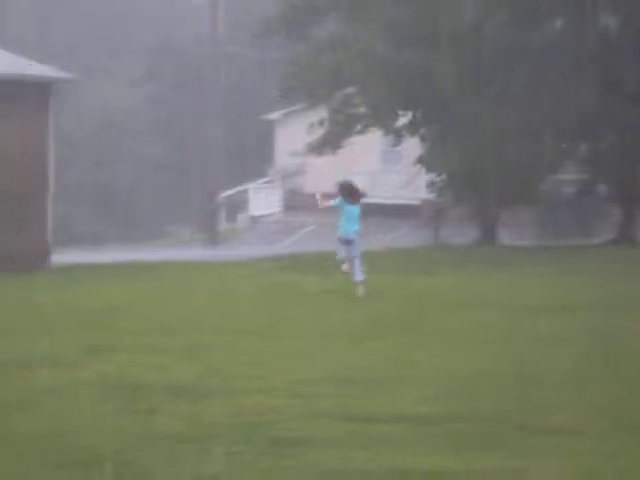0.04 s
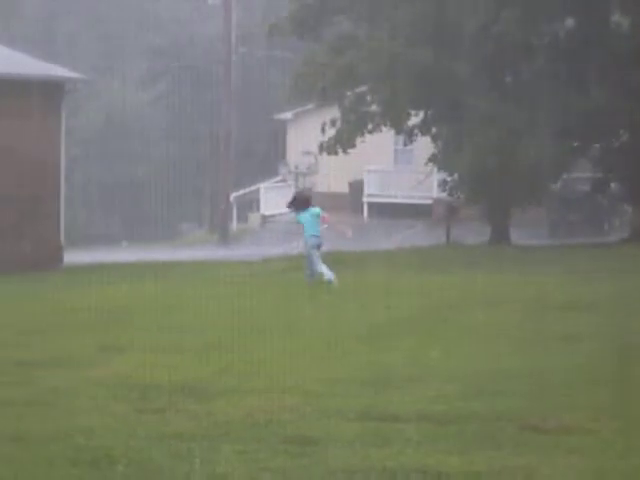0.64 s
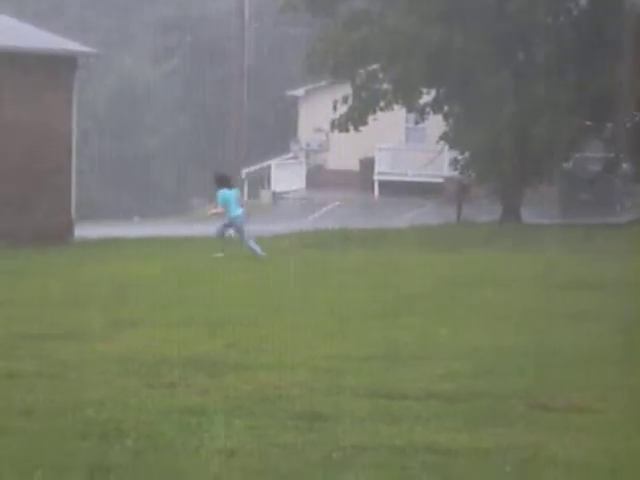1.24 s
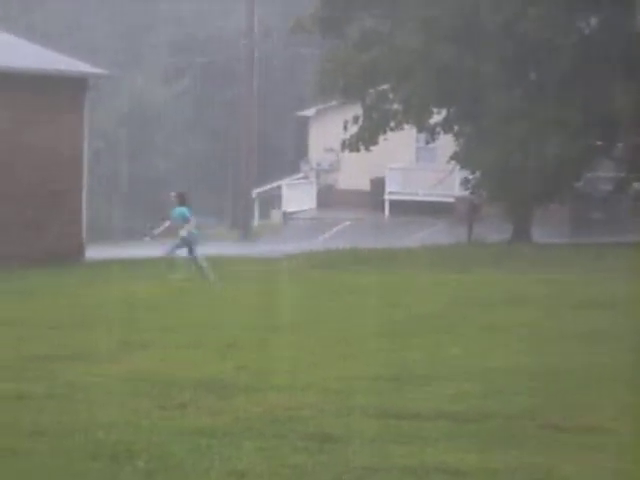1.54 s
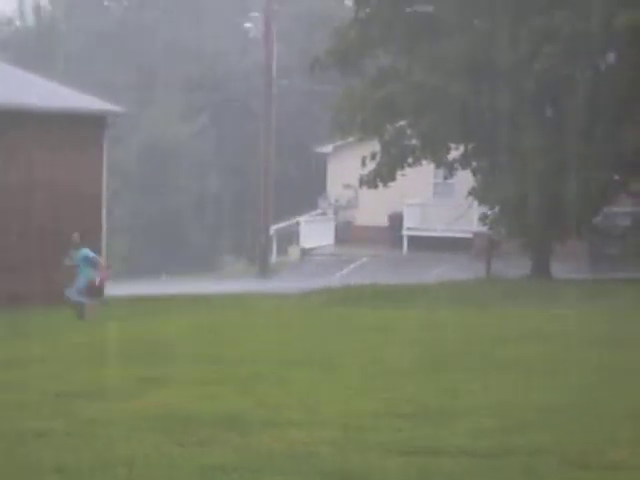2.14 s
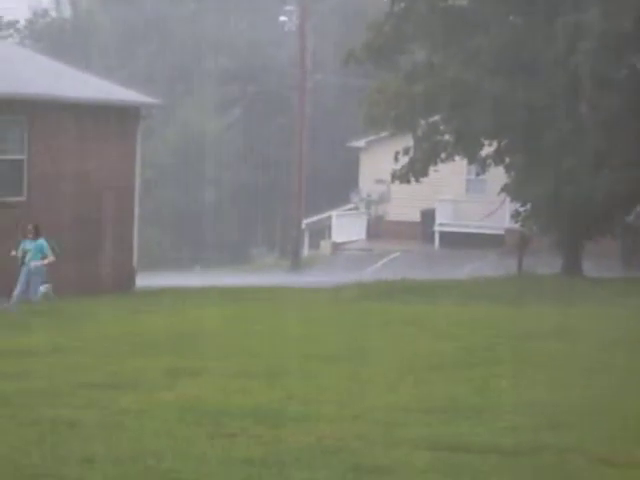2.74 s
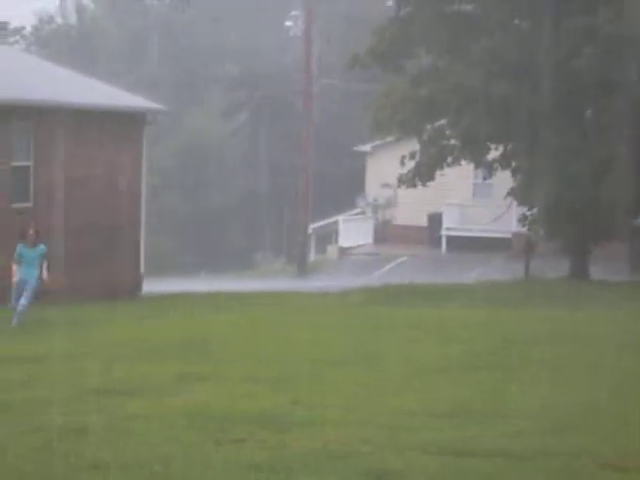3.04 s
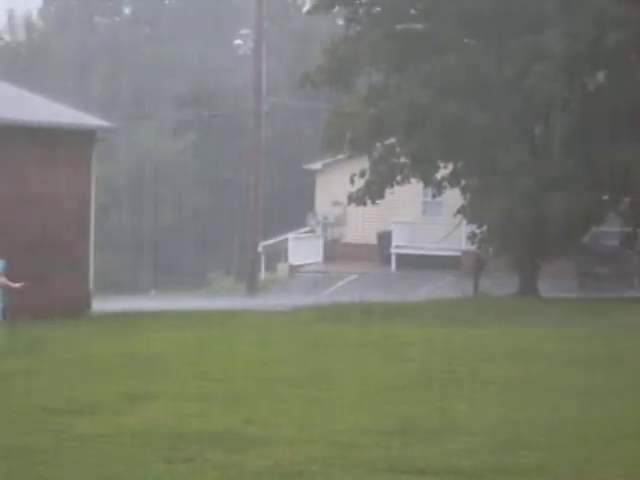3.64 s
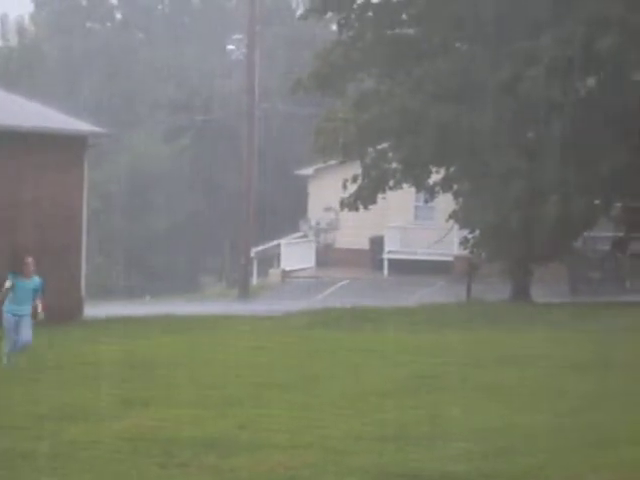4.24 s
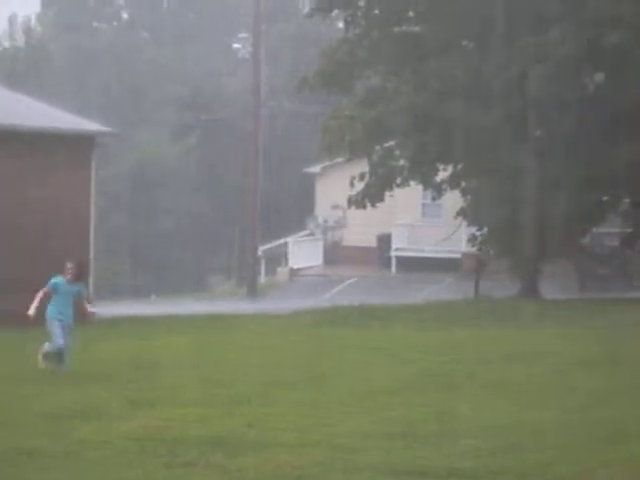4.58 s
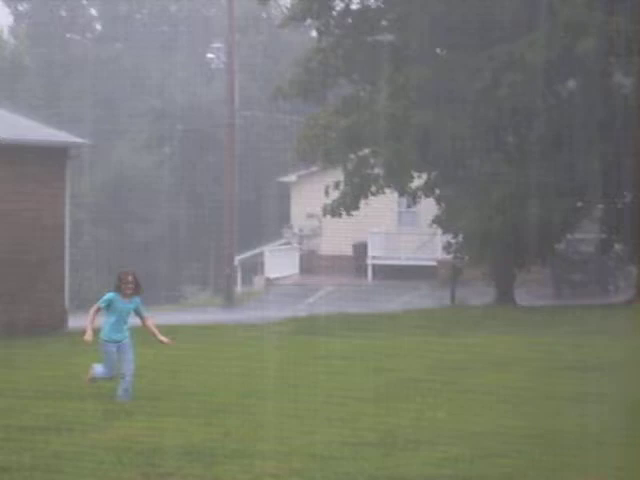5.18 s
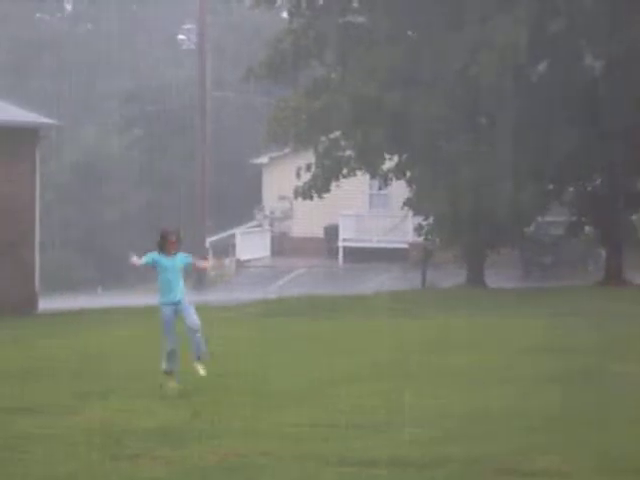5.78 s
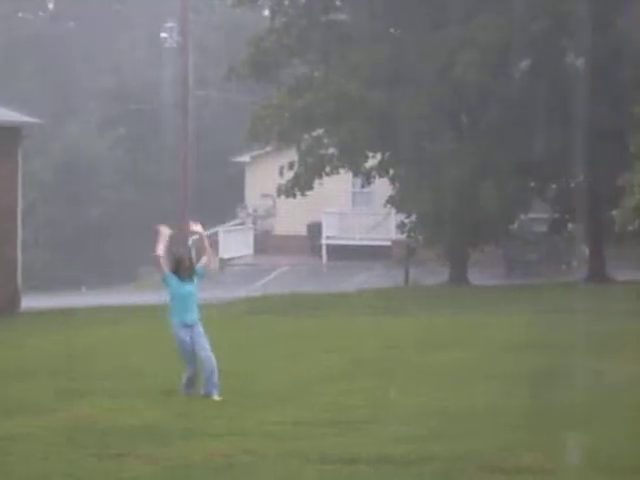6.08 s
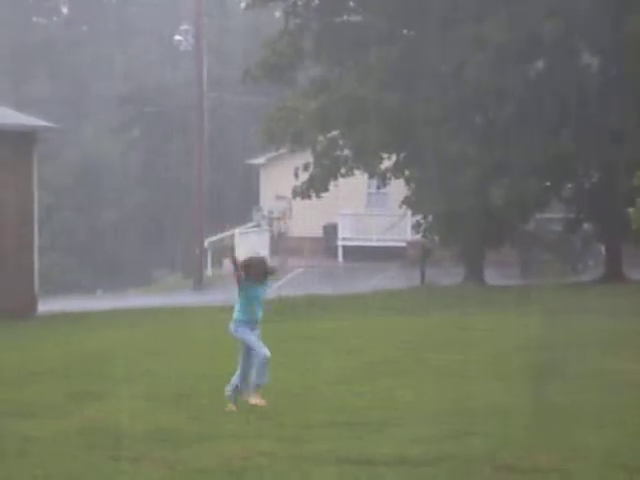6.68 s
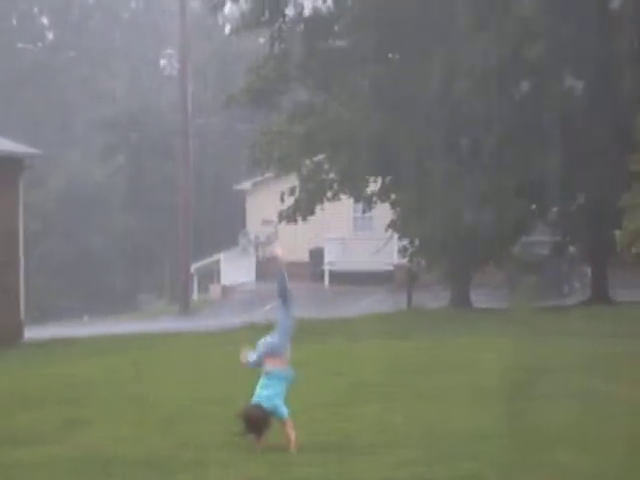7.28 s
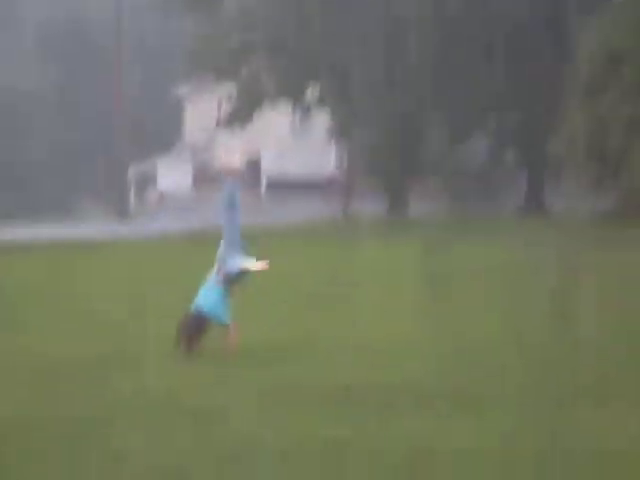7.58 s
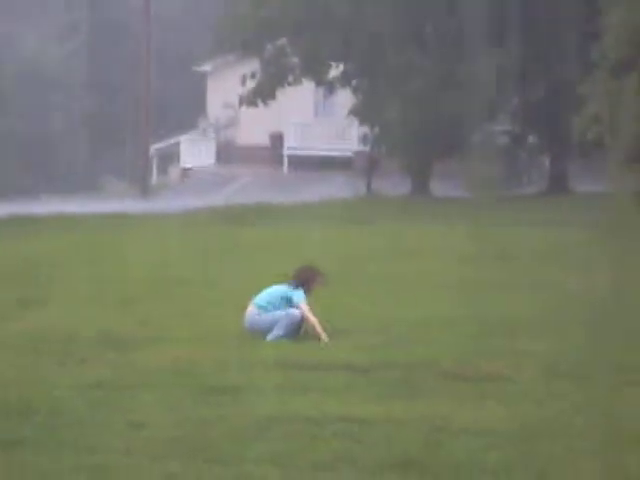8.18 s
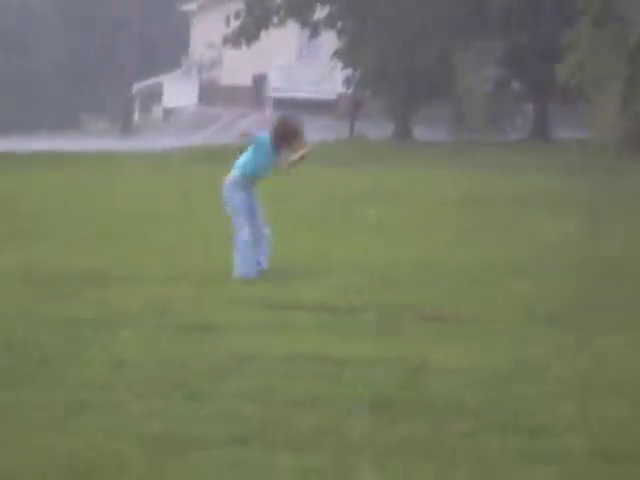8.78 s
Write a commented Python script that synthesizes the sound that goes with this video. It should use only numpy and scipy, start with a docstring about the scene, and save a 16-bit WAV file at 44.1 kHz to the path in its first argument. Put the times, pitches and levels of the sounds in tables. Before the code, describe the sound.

A dense downpour heard from under a porch, with runoff splattering on wet ground and a few small puddle plinks.

```python
"""Heavy rain on a lawn, trees and roofs, heard on a small microphone under a porch roof.
Far out, countless drops merge into a wash; on the nearby ground they patter. Close by, runoff
from the eave breaks up in splats on the wet ground and traps bubbles that plink in a puddle.
Some of it hits a piece of sheet metal that rings. The porch gives the near sounds a short tail."""
import sys
import numpy as np
from scipy import signal
from scipy.fft import rfft, irfft
from scipy.io import wavfile

SR = 44100
rng = np.random.default_rng(int(sys.argv[2]) if len(sys.argv) > 2 else 0)


def log_audio(samples):
    """Write samples as a 16-bit WAV file to the path given in sys.argv[1]."""
    # one column per channel
    frames = np.atleast_2d(samples).T
    # limit to full scale, then quantise
    limited = np.clip(frames, -1, 1)
    pcm = np.round(limited * 32767).astype(np.int16)
    wavfile.write(sys.argv[1], SR, pcm)


N = 397782

# spectra of the far wash, the near drops and a splat of runoff: f/Hz, relative level/dB
WASH_SPECTRUM = [(25, -27), (55, -24), (150, -12.5), (210, -12), (320, -12.5), (400, -10.5), (600, -10),
                 (800, -4), (1500, -6), (2600, -2.5), (3500, -2), (6200, -23), (10300, -34.5), (12400, -50)]
PATTER_SPECTRUM = [(300, -27.5), (900, -15.5), (1600, -11), (2700, -7), (3100, 0), (3700, 0), (4150, -7.5),
                   (5000, -11), (6200, -22.5), (8000, -26), (10400, -31.5), (12400, -63)]
SPLAT_SPECTRUM = [(200, -35.5), (550, -12), (1400, -15.5), (2200, -3), (3000, 1), (3800, 1.5), (5000, -9),
                  (6200, -20), (8000, -23), (10400, -38.5), (12400, -62)]
# resonances of the porch air, the metal sheet and the wet ground: f/Hz, width/Hz, level/dB
PORCH_AIR_MODES = [(38, 8.8, -32), (165, 14, -18.5), (218, 10, -12), (242.2, 5.4, 0.5), (320.3, 6.1, -11.5),
                   (407.7, 47, -2), (515.8, 9.9, -1.5), (766, 46, -9.5), (819, 43, -8.5), (991.4, 5.1, 3)]
SHEET_MODES = [(1317, 32, -6.5), (1779, 69, -6.5), (1783, 34, -3.5), (1866, 37, -2.5), (2470, 26, -22),
               (2978, 39, -5), (3010, 32, -5)]
WET_GROUND_MODES = [(2513, 70, 5.5), (2960, 200, 1.5), (3500, 100, -8.5)]
# strength of the shower; only its swing about the mean counts: t/s, level/dB
SHOWER_STRENGTH = [(0.0, -43), (0.38, -44), (0.8, -43.5), (1.71, -44.5), (2.18, -43), (3.24, -44.5),
                   (4.8, -41.5), (5.55, -44.5), (6.58, -42), (7.03, -42.5), (7.39, -42), (9.02, -44)]
# runoff striking the sheet: t/s, drive of low modes/dB, drive of high modes/dB
SHEET_DRIPS = [(0.937, -66, -41.5), (0.99, -66, -51), (1.345, -70, -51), (1.984, -54.5, -66),
               (3.831, -58, -55), (4.67, -60, -54), (4.822, -66, -60), (5.422, -55.5, -64),
               (5.808, -56, -48), (6.43, -58, -55), (6.622, -55, -54), (6.954, -55.5, -54),
               (7.238, -57, -72), (7.41, -59, -70), (8.072, -53, -55), (8.165, -60, -66), (8.705, -55, -58),
               (8.836, -49.5, -67), (8.885, -54.5, -64), (8.98, -58, -66)]
# big gobs landing under the eave: t/s, level/dB, spread/s, hollow body/dB, fine spray/dB
BIG_SPLATS = [(0.464, -38, 0.0018, -5, 0), (0.527, -37.5, .003, -14, 0), (0.61, -36, .0065, -7, 1),
              (0.639, -38.5, 0.0078, -1, 5), (0.796, -38.5, 0.012, -3, 0), (0.92, -35, .0025, 0, -1),
              (0.932, -33.5, 0.0053, 11, -7), (1.061, -42, .002, 0, -7), (1.337, -36.5, .008, -5, -4),
              (1.582, -35.5, 0.0021, 4, 6), (2.217, -38, .004, -9, -1), (2.341, -35.5, 0.01, -1, 2),
              (2.598, -35.5, 0.0056, -7, -1), (2.78, -41.5, .008, 8, -1), (2.93, -40.5, .007, -13, -1),
              (3.031, -38, 0.0042, 4, -12), (3.213, -41, 0.0074, 3, -3), (3.626, -42.5, 0.016, -1, -2),
              (3.948, -38, 0.0059, -8, -3), (4.063, -38.5, 0.0022, 7, -2), (4.188, -37.5, 0.0053, -13, -1),
              (4.437, -37, .005, 2, 3), (4.649, -38.5, .005, 2, 4), (4.766, -40, .009, 9, 7),
              (4.836, -40, 0.011, 2, 2), (4.956, -38.5, 0.012, -3, 1), (5.24, -37, 0.011, 0, -2),
              (5.273, -40.5, .012, 10, 6), (5.425, -38, 0.0059, 2, 1), (5.552, -38.5, 0.0063, -5, 2),
              (5.803, -41.5, 0.0059, -3, 7), (5.88, -35.5, 0.0071, 1, -1), (5.962, -39.5, 0.005, 8, -6),
              (6.254, -37, 0.0065, -2, -1), (6.437, -41, 0.0079, 6, -10), (6.679, -38.5, 0.0037, -5, 1),
              (6.911, -39.5, 0.0068, -5, 4), (7.026, -40, .002, -5, -4), (7.246, -40, .0045, 10, 0),
              (7.796, -44, .0065, -7, 5), (8.08, -35, 0.0099, 1, 2), (8.705, -39, 0.0096, 2, 0),
              (8.846, -37.5, .016, -3, -6)]
# air bubbles trapped in a puddle: t/s, f/Hz, level/dB
BUBBLES = [(0.931, 2980, -30), (1.339, 3010, -24), (1.343, 3250, -23.5), (2.215, 3970, -27.5),
           (2.335, 2630, -23), (4.949, 4340, -25), (6.372, 3200, -27.5)]
# water slapping down further off: t/s, level/dB
DISTANT_SPLATS = [(1.265, -43.5), (2.635, -44.5), (2.70, -46), (5.555, -43), (8.08, -49)]


def from_db(db):
    """Decibels to gain."""
    return 10 ** (np.asarray(db) / 20)


def unit_rms(x):
    """Scale to unit rms."""
    return x / np.sqrt(np.mean(x ** 2) + 1e-20)


def drift(rate_hz, step=40, settle=2000):
    """A slow random wander of unit rms."""
    pole = np.exp(-2 * np.pi * rate_hz * step / SR)
    noise = rng.standard_normal(N // step + settle + 2)
    slow = signal.lfilter([1], [1, -2 * pole, pole * pole], noise)[settle:]
    return np.interp(np.arange(N) / step, np.arange(len(slow)), unit_rms(slow))


def response(spectrum, size=4096):
    """Minimum-phase impulse response of a spectrum drawn on a log-frequency axis."""
    hz, db = np.transpose(spectrum)
    bin_db = np.interp(np.log(np.fft.rfftfreq(size, 1 / SR) + 1), np.log(hz), db)
    cepstrum = irfft(np.log(from_db(bin_db)))
    cepstrum[1:size // 2] *= 2
    cepstrum[size // 2 + 1:] = 0
    return irfft(np.exp(rfft(cepstrum)))


def colour(x, spectrum):
    """Filter a sound by a spectrum."""
    return signal.oaconvolve(x, response(spectrum))[:len(x)]


def resonate(x, hz, width_hz):
    """One resonance with gain 1 at its top."""
    radius = np.exp(-np.pi * width_hz / SR)
    zeros = np.array([1, 0, -1]) * (1 - radius ** 2) / 2
    poles = [1, -2 * radius * np.cos(2 * np.pi * hz / SR), radius ** 2]
    return signal.lfilter(zeros, poles, x + 1e-18)


def add(out, sound, at_s):
    """Mix a sound in from the given time on."""
    start = max(round(at_s * SR), 0)
    out[start:start + len(sound)] += sound[:max(N - start, 0)]


def impacts(per_s, spread_db, size=N):
    """Droplets land at random, most small and a few large."""
    strengths = from_db(spread_db * np.minimum(rng.exponential(1, size), 4))
    return strengths * rng.choice([-1, 1], size) * (rng.random(size) < per_s / SR)


def far_wash(waver_db=0.55):
    """Far drops merge into a smooth roar that stirs the air under the porch roof."""
    wash = colour(rng.standard_normal(N), WASH_SPECTRUM)
    stir = rng.standard_normal(N)
    boom = sum(from_db(db) * resonate(stir, hz, width) for hz, width, db in PORCH_AIR_MODES)
    return unit_rms(wash + boom) * from_db(waver_db * drift(rate_hz=3.5))


def near_patter(per_s=3000, clump_db=3.5, surfaces=4):
    """Drops on the nearby ground come in clumps, each surface with a slightly different pitch."""
    out = np.zeros(N)
    for pitch in np.geomspace(.96, 1.04, surfaces):
        drops = impacts(per_s / surfaces, spread_db=2.5) * from_db(clump_db * drift(rate_hz=29))
        out += colour(drops, [(hz * pitch, db) for hz, db in PATTER_SPECTRUM])
    return unit_rms(out)


def close_splashes(fade_s=0.008, bright_hz=3800):
    """Single drops near the microphone burst with a sharp front and a short fizz of spray."""
    t = np.arange(SR // 16) / SR
    drops = abs(impacts(per_s=45, spread_db=2.5))
    bursts = signal.oaconvolve(drops, np.exp(-t / fade_s))[:N]
    fizz = colour(bursts * rng.standard_normal(N), PATTER_SPECTRUM)
    highpass = signal.butter(2, bright_hz, "high", fs=SR, output="sos")
    return unit_rms(signal.sosfilt(highpass, fizz))


def sheet_metal(steady_db=-62.5, scatter_s=0.026, rattle_db=-4, rattle_s=0.096, split_hz=2200):
    """Droplets ring the sheet: a light steady drumming, and bursts that rattle as water falls back."""
    t = np.arange(SR // 2) / SR
    burst = np.exp(-t / scatter_s) + from_db(rattle_db) * np.exp(-t / rattle_s)
    low_drive, high_drive = np.full((2, N), from_db(steady_db))
    for at_s, low_db, high_db in SHEET_DRIPS:
        add(low_drive, from_db(low_db) * burst, at_s)
        add(high_drive, from_db(high_db) * burst, at_s)
    drops = unit_rms(impacts(per_s=900, spread_db=3))
    out = np.zeros(N)
    for hz, width, db in SHEET_MODES:
        drive = high_drive if hz > split_hz else low_drive
        equal_power = np.sqrt(SR / (np.pi * width))
        out += from_db(db) * equal_power * resonate(drive * drops, hz, width)
    return out


def lesser_gobs(per_s=6, spread_s=.005, count=200):
    """The eave sheds lesser gobs at uneven intervals; gives rows laid out like BIG_SPLATS."""
    times = np.cumsum(rng.gamma(2, .5, count)) / per_s
    levels_db = rng.normal([-44.5, 0, 0], [0.5, 4, 2], (count, 3))
    return [(at_s, db, spread_s, body_db, spray_db)
            for at_s, (db, body_db, spray_db) in zip(times, levels_db) if at_s < N / SR]


def runoff_splats(gobs, attack=0.6, body_hz=2500, spray_hz=4300, size=8192):
    """Each gob lands under the eave as a tight cloud of droplets, with its own body and spray."""
    out = np.zeros(N)
    t = (np.arange(size) - size // 2) / SR
    splash = response(SPLAT_SPECTRUM)
    splash += sum(from_db(db) * resonate(splash, hz, width) for hz, width, db in WET_GROUND_MODES)
    spray_band = signal.butter(2, spray_hz, "high", fs=SR, output="sos")
    for at_s, db, spread_s, body_db, spray_db in gobs:
        # the cloud builds up faster than it thins out
        since_peak = t / spread_s + (1 - attack)
        flank = np.where(since_peak < 0, attack, 2 - attack)
        cloud = np.exp(-(since_peak / flank / 2) ** 2)
        droplets = cloud * impacts(per_s=4000, spread_db=2.1, size=size)
        hit = signal.fftconvolve(droplets, splash)[:size]
        hit += (from_db(body_db) - 1) * resonate(hit, body_hz, width_hz=950)
        hit += (from_db(spray_db) - 1) * signal.sosfiltfilt(spray_band, hit)
        cloud_rms = np.sqrt(np.mean(cloud ** 2))
        add(out, from_db(db) * cloud_rms * unit_rms(hit), at_s + t[0])
    return out


def bubble_plinks(t60_s=0.027, rise_s=0.00072):
    """Each air bubble trapped in the puddle rings for a few dozen cycles."""
    out = np.zeros(N)
    t = np.arange(SR // 8) / SR
    envelope = from_db(-60 * t / t60_s) * (1 - np.exp(-t / rise_s))
    for at_s, hz, db in BUBBLES:
        add(out, from_db(db) * envelope * np.sin(2 * np.pi * hz * t), at_s)
    return out


def far_splats(spread_s=0.02):
    """Distance dulls slaps of water and smears them into short swells with the colour of the wash."""
    t = np.arange(N) / SR
    swells = sum(from_db(db) * np.exp(-np.minimum(((t - at_s) / (2 * spread_s)) ** 2, 20))
                 for at_s, db in DISTANT_SPLATS)
    return swells * unit_rms(colour(rng.standard_normal(N), WASH_SPECTRUM))


def porch(x, t60_s=0.51, tail_db=-6.5, first_echo_s=.006, block=2048):
    """Wall, floor and roof around the microphone return a short diffuse tail."""
    out = x.copy()
    t = np.arange(SR // 3) / SR
    fade = from_db(-60 * t / t60_s) * (t > first_echo_s)
    fade *= from_db(tail_db) / np.linalg.norm(fade)
    for start in range(0, N, block):
        tail = fade * rng.standard_normal(len(t))  # new each block, as drops land in new spots
        add(out, signal.fftconvolve(x[start:start + block], tail), start / SR)
    return out


def scene(wash_db=-45, patter_db=-46.5, splash_db=-55, swell_depth=1.22):
    """From the porch, in mono: the wash far off, patter in front of it, runoff close by."""
    # patter and lesser gobs follow the shower; the far wash averages out
    shower_db = np.interp(np.arange(N) / SR, *np.transpose(SHOWER_STRENGTH))
    swell_db = swell_depth * (shower_db - shower_db.mean())
    far = from_db(wash_db) * far_wash() + far_splats()
    drops = from_db(patter_db + swell_db) * near_patter() + from_db(splash_db) * close_splashes()
    runoff = sheet_metal() + runoff_splats(BIG_SPLATS) + bubble_plinks()
    runoff += from_db(swell_db) * runoff_splats(lesser_gobs())
    return (far + porch(drops + runoff))[None]


def record(dry, roll_off_hz=11200, cutoff_hz=12000):
    """A small camera microphone: the top rolls off, then is cut steeply."""
    roll_off = signal.butter(10, roll_off_hz, fs=SR, output="sos")
    steep_cut = signal.ellip(10, .2, 80, cutoff_hz, fs=SR, output="sos")
    return signal.sosfilt(steep_cut, signal.sosfilt(roll_off, dry))


dry = scene()
out = record(dry)
log_audio(out)
```